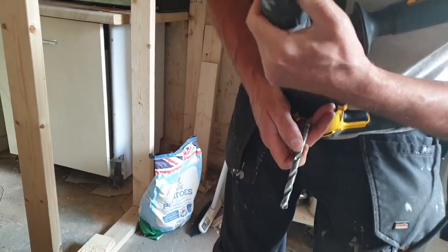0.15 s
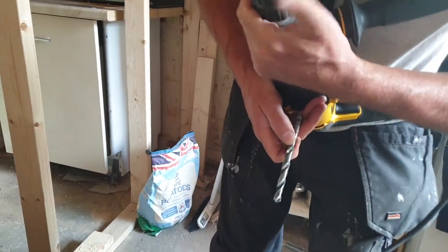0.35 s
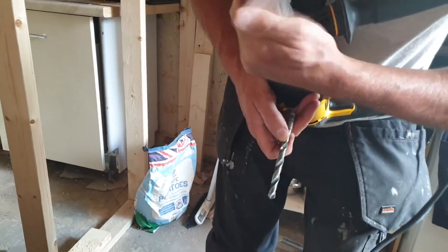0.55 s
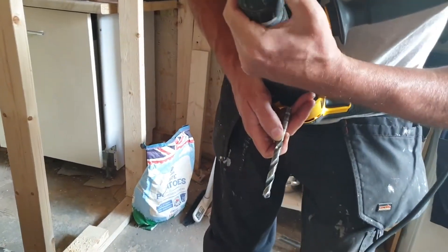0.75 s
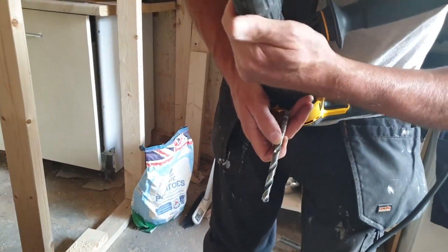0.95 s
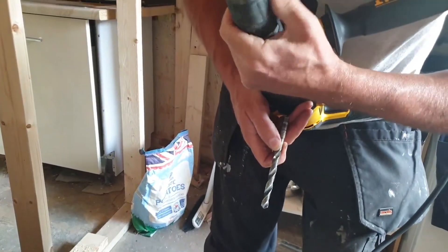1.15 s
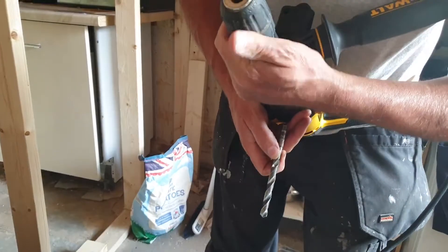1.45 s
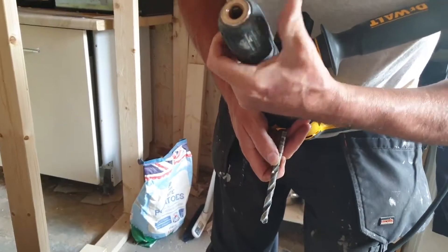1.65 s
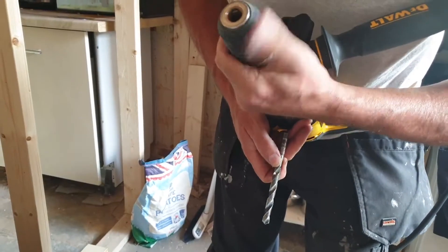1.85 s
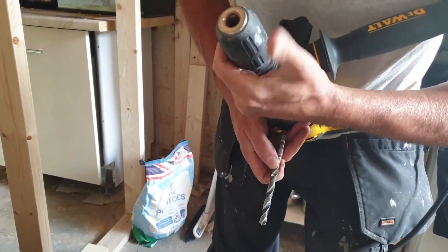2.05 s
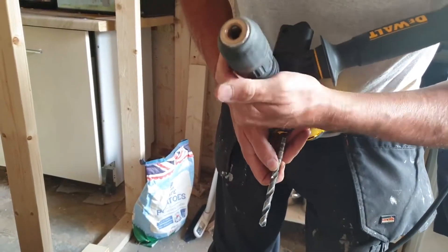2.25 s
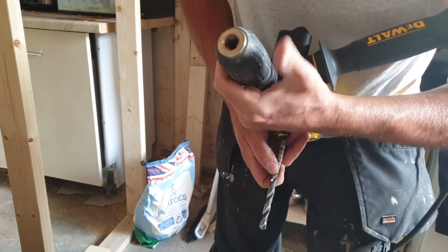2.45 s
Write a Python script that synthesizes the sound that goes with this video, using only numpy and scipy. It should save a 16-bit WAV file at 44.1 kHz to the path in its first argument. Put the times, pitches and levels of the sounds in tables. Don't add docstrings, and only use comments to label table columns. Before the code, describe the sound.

Short dry ratcheting rasps from a hand-twisted drill chuck, about three per second, with hard knocks of plastic and steel between them, slight hand rubbing and one small squeak, heard close in a bare, quiet room.

```python
import sys
import numpy as np
from scipy import signal
from scipy.fft import rfft, irfft
from scipy.io import wavfile
from scipy.ndimage import uniform_filter1d

SR = 44100
rng = np.random.default_rng(int(sys.argv[2]) if len(sys.argv) > 2 else 0)


def master_out(mix):
    frames = np.transpose(np.atleast_2d(mix))
    ceiling = np.clip(frames, -1, 1)
    pcm = np.round(ceiling * 32767).astype(np.int16)
    wavfile.write(sys.argv[1], SR, pcm)


def ratio_of_db(decibels):
    return 10 ** (np.asarray(decibels, float) / 20)


N = 114660
T = np.arange(N) / SR

# centre_hz, width_hz, level_db
BODY_MODES = [
    (454, 96, -17),
    (711, 50, -14),
    (950, 42, -11.5),
]
# centre_hz, width_hz, level_db
SHELL_MODES = [(1350, 209, -3), (1413.5, 257.5, 0.5), (1683, 605, -5), (2262, 317, 0), (2826, 343, -2.5)]
# centre_hz, width_hz, level_db
JAW_MODES = [
    (3653, 280, -0.5),
    (3994, 1320, -6),
    (5413, 520, -9),
]
# centre_hz, width_hz, level_db
METAL_MODES = [(6248, 620, -10), (7740, 2370, -18.5), (10970, 520, -11), (14210, 570, -16.5),
               (15120, 1240, -19)]


def level(x, db):
    return x * ratio_of_db(db) / np.sqrt(np.mean(x ** 2))


def band(x, hz, width_hz):
    return signal.lfilter(*signal.iirpeak(hz, hz / width_hz, fs=SR), x)


def ring(x, modes):
    return sum((-1) ** k * ratio_of_db(db) * band(x, hz, width_hz) for k, (hz, width_hz, db) in enumerate(modes))


def walk(rate_hz):
    hold = int(SR / rate_hz)
    steps = np.repeat(rng.standard_normal(N // hold + 1), hold)
    return 1.2 * uniform_filter1d(steps, hold)[:N]


def on_log(table, hz):
    table = np.array(table, float)
    return np.interp(np.log(hz + 1), np.log(table[:, 0]), table[:, 1])


def decay(t, t60_s):
    return np.exp(-np.log(1000) * t / t60_s)


def burst(t60_s):
    t = T[:int(.08 * SR)]
    return rng.standard_normal(len(t)) * decay(t, t60_s)


def gears():
    grips = [.2035, .539, .8675, 1.22, 1.534, 1.8135, 2.234]
    # fastest_s, peak_db, creep_db, teeth_per_s
    twists = [(.295, -43, -53, 227), (.645, -42, -51.5, 219), (.938, -40.5, -61, 230),
              (1.315, -39.5, -47.5, 236), (1.65, -45, -54, 220), (1.971, -38, -60, 226),
              (2.303, -36, -59.5, 244)]
    # rise_s, fall_s, creep_growth_db_per_s, treble_db, tooth_db
    swings = [(.03, .03, 25.5, -4, -6.5), (.022, 0.036, 49, -3.5, -2.), (.018, .025, 65, -2.5, -3.5),
              (0.017, .03, 39, -3.5, 0), (.012, .025, 45, -7, -4), (.028, .035, 57, -3, -1.5),
              (.013, .027, 330.5, -7., -1)]
    force, teeth_force = np.zeros(N), np.zeros(N)
    rate, treble = np.zeros(N), np.ones(N)
    for grip_s, twist, motion in zip(grips, twists, swings):
        top_s, peak_db, creep_db, teeth_per_s = twist
        rise_s, fall_s, growth_db, treble_db, tooth_db = motion
        swing = np.exp(-.5 * ((T - top_s) / np.where(T < top_s, rise_s, fall_s)) ** 2)
        creep = ratio_of_db(creep_db + growth_db * (np.minimum(T, top_s) - grip_s))
        creep = creep * np.where(T < top_s, T > grip_s, swing)
        force += ratio_of_db(peak_db) * swing + creep
        teeth_force += ratio_of_db(peak_db + tooth_db) * swing
        rate = np.maximum(rate, teeth_per_s * swing ** .1)
        treble[T > grip_s] = ratio_of_db(treble_db)

    turns = np.cumsum(rate) / SR
    chance = rng.standard_normal((N // 100, 2))
    tooth = np.arange(1, int(turns[-1]))
    at = np.searchsorted(turns, tooth + .1 * chance[tooth, 0]).clip(0, N - 1)
    blows = np.zeros(N)
    blows[at] = ratio_of_db(3.0 * chance[tooth, 1])

    contact_s = .00012
    thump = signal.lfilter([1], [1, -np.exp(-1 / (contact_s * SR))], blows)
    thump = level(thump, 0) * teeth_force
    bite = signal.lfilter([1], [1, -.96], blows) * rng.standard_normal(N)
    bite = level(bite, -4.0) * teeth_force
    flicker_db = 3.0 * walk(400)
    grind = level(rng.standard_normal(N) * ratio_of_db(flicker_db), 0)

    unit = np.std(ring(grind, SHELL_MODES))
    low = ring(thump, SHELL_MODES[:3]) + ratio_of_db(-11.0) * ring(thump, SHELL_MODES[3:])
    low = low + ring(ratio_of_db(-6.0) * grind * force, BODY_MODES + SHELL_MODES)
    high = ring((bite + grind * force) * treble, JAW_MODES + METAL_MODES)
    return (low + high) / unit


def knocks():
    # start_s, peak_db, jaw_db, treble_db, rattle_t60_s
    slack_hits = [(0.204, -25.5, 7, 0, 0.046), (0.2084, -35, 3.5, -12, 0.026), (0.2395, -10, 6.5, 4, 0.033),
                  (0.2414, -17, 1, 18, 0.039), (0.4127, -33, -10, -3.5, 0.042), (0.417, -25, 4, 2.5, 0.057),
                  (0.5331, -45, -2, 2, 0.03), (0.5391, -18.5, -4.5, 4, 0.089),
                  (0.637, -20, -20, -10, 0.035), (0.868, -43, 6.5, -2.0, 0.035),
                  (0.872, -41.5, 5.5, -7, 0.024), (1.2201, -27, 2, -8, 0.02), (1.2537, -25, 3, -3.5, 0.042),
                  (1.534, -46, 8, -11, 0.031), (1.5404, -55, 18.5, -2.0, 0.028),
                  (1.5841, -24.5, -4.5, -5.5, 0.036), (1.6378, -22.5, -7, -13, 0.041),
                  (1.814, -24.5, 0.5, -1, 0.058), (1.8593, -34, -9.5, -6.5, 0.024),
                  (1.8631, -35, 5, -4, 0.026), (1.957, -20.5, 8.5, 1.5, 0.03),
                  (2.2353, -54, 8.5, -17, 0.033), (2.2484, -50, 9, -2.0, 0.033),
                  (2.3175, -26.5, 1.5, 2.5, 0.031)]
    crack_s, rattle_db, blow_size = .00017, -17, 1.76
    thud_db, upper_shell_db, gain_db = -27, -4.0, 1.5
    out = np.zeros(N + SR)
    for start_s, peak_db, jaw_db, treble_db, rattle_t60_s in slack_hits:
        push = burst(crack_s * np.log(1000)) + ratio_of_db(rattle_db) * burst(max(rattle_t60_s, .004))
        push[:3] += blow_size * np.array([.5, 1, .5])
        parts = [(BODY_MODES, thud_db), (SHELL_MODES[:3], 0), (SHELL_MODES[3:], upper_shell_db),
                 (JAW_MODES, jaw_db), (METAL_MODES, treble_db)]
        hit = sum(level(ring(push, modes), part_db) for modes, part_db in parts)
        i = int(start_s * SR)
        out[i:i + len(hit)] += hit * ratio_of_db(peak_db + gain_db) / np.abs(hit).max()
    return out[:N]


def rubbing():
    # centre_s, level_db, spread_s, centre_hz, width_hz
    rubs = [(.005, -46, 0.023, 2500, 2500), (.065, -54, 0.033, 14500, 2800), (.13, -57, 0.096, 3020, 2100),
            (.395, -58, 0.0081, 14500, 10000), (.45, -60, 0.031, 3800, 520), (1.073, -62, 0.086, 3600, 400),
            (1.41, -65.5, .07, 4100, 364), (2.15, -70, .09, 3900, 790), (1.78, -68, 0.094, 4000, 390),
            (1.771, -69, 0.14, 21000, 4200), (1.1, -79, 0.14, 14000, 1500), (0.16, -65, 0.24, 400, 370),
            (0.46, -69.5, 0.23, 410, 49), (1.024, -70, 0.086, 410, 43), (0.028, -65, 0.056, 150, 200),
            (1.86, -69, 0.053, 80, 76)]
    out = np.zeros(N)
    for centre_s, level_db, spread_s, hz, width_hz in rubs:
        grain_db = 2.0 * (hz > 1000) * walk(120)
        hiss = band(rng.standard_normal(N) * ratio_of_db(grain_db), hz, width_hz)
        out += level(hiss, level_db) * np.exp(-.5 * ((T - centre_s) / spread_s) ** 2)
    return out


def squeak():
    # time_s, fundamental_db, octave_db
    swell = [
        (.99, -94, -63),
        (1.03, -82.5, -60.5),
        (1.09, -71.5, -61),
        (1.13, -62.5, -58),
        (1.18, -61, -58.5),
        (1.214, -68, -61.5),
        (1.231, -80.5, -41),
    ]
    time_s, low_db, high_db = np.array(swell, float).T
    on = (T > time_s[0]) & (T < time_s[-1])
    wobble = walk(250)
    out = np.zeros(N)
    for harmonic, level_db in ((1, low_db), (2, high_db)):
        hz, width_hz = harmonic * 2125, harmonic * 35
        fuzz = band(band(rng.standard_normal(N), hz, 2 * width_hz), hz, 4 * width_hz)
        tone = np.sin(2 * np.pi * np.cumsum(hz + width_hz * wobble) / SR)
        throb_db = 2.5 * walk(94)
        out += on * ratio_of_db(np.interp(T, time_s, level_db) + throb_db) * (level(fuzz, -3.0) + tone)
    return out


def late(x, delay_s):
    return np.interp(T - delay_s, T, x)


def sway(delay_s):
    return np.round((delay_s + .00007 * walk(8)) * SR) / SR


def room(x):
    t = T[:int(.5 * SR)]
    noise = rng.standard_normal((2, len(t)))
    low = signal.lfilter(*signal.butter(1, 3500, fs=SR), noise)
    gap_s, low_t60_s, treble_t60_s = .0051, .21, .17
    tail = low * decay(t, low_t60_s) + (noise - low) * decay(t, treble_t60_s)
    tail = tail * (t > gap_s)
    tail = tail * ratio_of_db(-9) / np.sqrt(np.sum(tail ** 2) / 2)
    return signal.fftconvolve(x[None], tail, axes=1)[:, :N]


def floor():
    # hz, db_per_hz
    noise_colour = [(25, -25), (55, -9), (200, -11), (410, -13.5), (1150, -25), (7000, -34), (9500, -45),
                    (15500, -29)]
    hz = np.fft.rfftfreq(N, 1 / SR)
    spectra = rfft(rng.standard_normal((2, N))) * ratio_of_db(on_log(noise_colour, hz)) * (hz > 20)
    mid, side = irfft(spectra, N)
    side = side * ratio_of_db(-6)
    return level(np.array([mid + side, .8 * (mid - side)]) * ratio_of_db(1.0 * walk(5)), -71)


def scene():
    # delay_s, left_db, right_db
    echoes = [
        (.0007, -9.5, -30.5),
        (.0013, -31.5, -9.5),
        (.0024, -10, -23),
    ]
    # hz, difference_db
    port_colour = [(300, 0.5), (1500, 3), (2500, -2), (4200, 2.5), (8000, 7.5), (11000, 1), (15500, 11.5)]
    # hz, gain_db
    mic_colour = [(1000, 0), (8000, 2), (9200, 2.5), (10500, 2.5), (11600, 2.5), (12400, 1.5), (13600, 2.5)]
    drill = gears() + knocks() + rubbing() + squeak()
    shadow_hz, far_port_s = 2564, .00019
    low = signal.filtfilt(*signal.butter(2, shadow_hz, fs=SR), drill)
    far = low + late(drill - low, sway(far_port_s))
    both = np.array([drill, far]) + room(drill)
    for delay_s, left_db, right_db in echoes:
        both = both + ratio_of_db(np.array([[left_db], [right_db]])) * late(drill, sway(delay_s))
    hz = np.fft.rfftfreq(N, 1 / SR)
    tilt = ratio_of_db(on_log(port_colour, hz) / 2)
    colour = ratio_of_db(on_log(mic_colour, hz)) * np.array([tilt, 1 / tilt])
    return irfft(rfft(both) * colour, N) + floor()


def band_limit(x):
    return signal.sosfilt(signal.butter(12, 17140, fs=SR, output="sos"), x)


def record(dry):
    top_cut = signal.ellip(6, .3, 30, 15900, fs=SR, output="sos")
    mix = signal.sosfilt(top_cut, dry)
    return band_limit(mix)


dry = scene()
out = record(dry)
master_out(out)
```